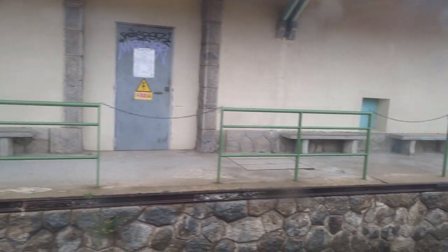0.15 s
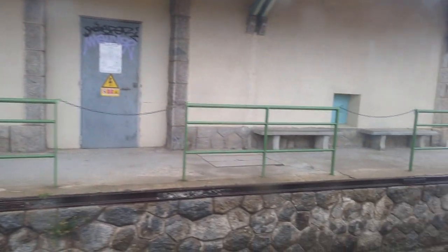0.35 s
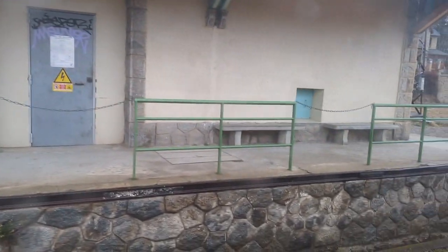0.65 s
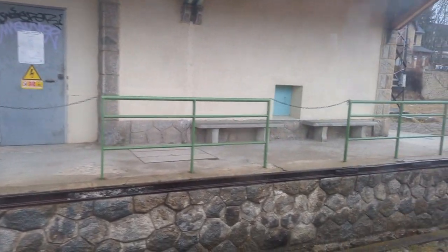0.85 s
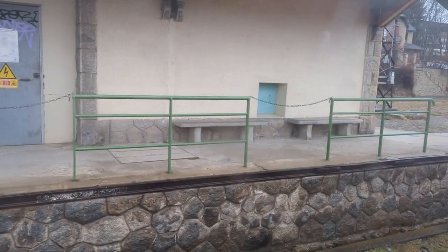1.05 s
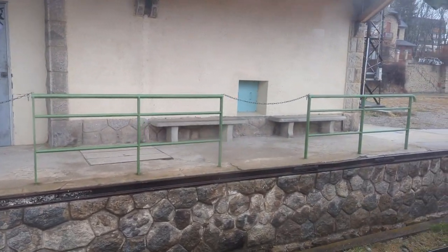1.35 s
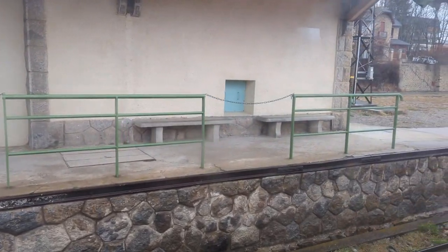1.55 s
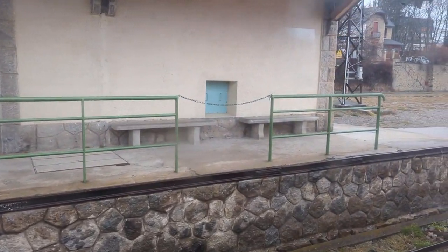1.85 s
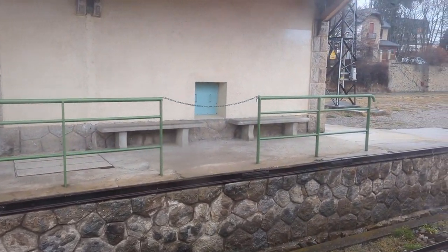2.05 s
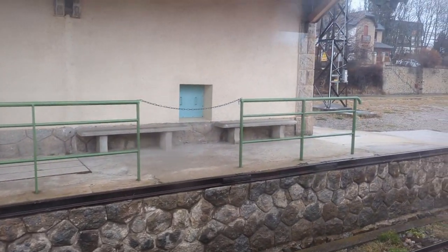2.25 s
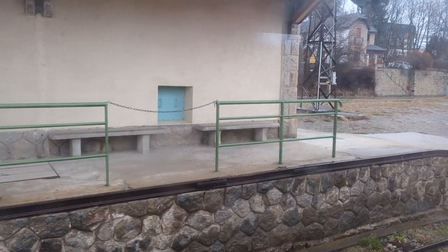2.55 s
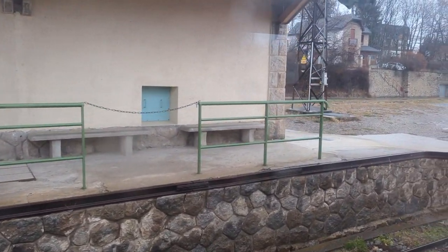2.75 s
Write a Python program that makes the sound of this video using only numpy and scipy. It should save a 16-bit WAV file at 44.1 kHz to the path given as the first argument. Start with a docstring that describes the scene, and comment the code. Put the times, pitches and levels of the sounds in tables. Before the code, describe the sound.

A train rumbles and booms, heard from a window seat as it slows into a station. Loose fittings chatter and clank close by, the floor thumps, a wheel rubs faintly, and a soft air hiss comes near the end.

```python
"""Inside a narrow-gauge electric railcar slowing into a station, stereo microphone at a window seat.
From the start the wheels rumble on the rails, the body booms and a panel drones. Jolts thump the floor;
close by, loose fittings chatter, knock, tick and clank in the small cabin, busiest in the first second.
Then a wheel rubs faintly, in fits, and near the end a soft hiss of air sets in."""
import sys
import numpy as np
from scipy import signal
from scipy.fft import rfft, irfft, next_fast_len
from scipy.io import wavfile
from scipy.ndimage import map_coordinates

SR = 44100
rng = np.random.default_rng(int(sys.argv[2]) if len(sys.argv) > 2 else 0)


def inscribe(sig):
    """Save sig as 16-bit PCM at rate SR to the path in sys.argv[1].

    A 1-D sig is mono; a 2-D sig holds one channel per row.
    Samples are clipped to [-1, 1] before scaling.
    """
    pcm = np.round(np.clip(np.atleast_2d(sig).T, -1, 1) * 32767)
    wavfile.write(sys.argv[1], SR, pcm.astype(np.int16))


N = 127890
CABIN_T60_S = 0.13

# Left-right likeness of the cabin sound and of the rattling parts. Each row: frequency in Hz, coherence.
CABIN_COHERENCE = [(60, 0.98), (280, .96), (450, 0.81), (700, 0.58), (1100, -0.15), (5600, 0.044),
                   (7000, 1), (11000, 0.98)]
RATTLE_COHERENCE = [(400, 0.8), (1200, -0.26), (4200, -0.18), (5600, 0.43), (7500, 0.97), (11000, 0.93)]
# Resonances of the loose fittings. Each row: centre in Hz, width in Hz, gain in dB.
FITTING_MODES = [(3730, 410, 2), (4290, 100, -2), (5090, 280, -3.5), (6030, 460, -3), (6310, 310, 3.5),
                 (8430, 1300, -3), (10840, 790, -4), (11550, 1400, -5.5), (14260, 900, -7.5)]


def amp(db):
    """Decibels to gain."""
    return 10 ** (np.asarray(db) / 20)


def unit(x):
    """Scale to rms 1."""
    return x / np.sqrt(np.mean(x ** 2) + 1e-20)


def along(points, hz):
    """Read (Hz, value) points on a log axis."""
    freqs, values = np.transpose(points)
    return np.interp(np.log(hz + 1), np.log(freqs + 1), values)


def clock():
    """Time of each sample in seconds."""
    return np.arange(N) / SR


def level(rows):
    """Gain per sample from (s, dB) rows."""
    return amp(np.interp(clock(), *np.transpose(rows)))


def wobble(per_s):
    """A smooth random curve, per_s knots a second."""
    return map_coordinates(rng.standard_normal(4096), [clock() * per_s], mode="wrap")


def filtered(x, response):
    """Pass x through a frequency response."""
    size = next_fast_len(N + SR // 2)
    return irfft(rfft(x, size) * response(np.fft.rfftfreq(size, 1 / SR)), size)[..., :N]


def spread(pair, coherence):
    """Turn two unrelated signals into left and right of a given likeness."""
    angle = lambda hz: np.arccos(np.clip(along(coherence, hz), -1, 1)) / 2
    mid, side = filtered(pair, lambda hz: np.array([np.cos(angle(hz)), np.sin(angle(hz))]))
    return np.array([mid + side, mid - side])


def coloured(spectrum):
    """Response through (Hz, dB) points."""
    return lambda hz: amp(along(spectrum, hz))


def resonant(modes):
    """Response of (Hz, width in Hz, dB) resonances, alternating in sign."""
    return lambda hz: sum((-1) ** k * amp(db) * 1j * hz * width / (centre**2 - hz**2 + 1j * hz * width)
                          for k, (centre, width, db) in enumerate(modes))


def shaped(pair, response, coherence):
    """A white pair coloured and spread without changing its power."""
    rms_gain = np.sqrt(np.mean(np.abs(response(np.linspace(0, SR / 2, num=8192))) ** 2))
    return spread(filtered(pair, response), coherence) / rms_gain


def rush(response):
    """Steady coloured stereo noise."""
    return unit(shaped(rng.standard_normal((2, N)), response, CABIN_COHERENCE))


def wheels():
    """Wheels rumble and roll; the rails roar above them and the running gear's steel rings along."""
    # Each row: time in seconds, relative level in dB.
    roll_levels = [(0.0, -51.5), (0.09, -48.5), (0.48, -53), (2.4, -56), (2.54, -58.5), (2.9, -55.5)]
    roar_levels = [(0, -56), (.1, -49.5), (.33, -55), (.5, -62), (.8, -62), (.97, -61.5), (1.3, -59.5),
                   (1.5, -65), (1.9, -61), (2.07, -68), (2.3, -69.5), (2.9, -66)]
    # Noise spectra. Each row: frequency in Hz, relative density in dB.
    rumble_colour = [(15, -60.5), (25, -35.5), (32, -19.5), (42, -4), (53, 2.5), (75, -1), (100, -5),
                     (125, -7), (215, -11.5), (285, -10), (340, -20.5), (450, -39.5), (900, -85.5)]
    rolling_colour = [(150, -29.5), (300, 0.5), (400, 2), (455, 0.5), (525, 1.5), (620, 0), (750, -5.5),
                      (1000, -4.5), (1250, -12.5), (2000, -54), (5000, -58.5)]
    roar_colour = [(500, -7.5), (1100, -2), (1700, 0.5), (2400, -7), (3200, -13), (3850, -10),
                   (4500, -17.5), (5400, -21.5), (6700, -24), (7500, -32.5), (15000, -39.5)]
    # Each row: centre in Hz, width in Hz, gain in dB.
    steel_modes = [(937, 30, 0.5), (1750, 180, 6), (2096, 70, 9.5), (2790, 250, 3), (4480, 29, -1.5),
                   (3950, 66, 1)]
    roll = level(roll_levels)
    rumble = amp(15.5) * roll * rush(coloured(rumble_colour))
    rolling = amp(-1) * roll * amp(2.0 * wobble(60)) * rush(coloured(rolling_colour))
    roar = amp(-1) * level(roar_levels) * amp(1.36 * wobble(35.21))
    rails = rush(coloured(roar_colour))
    steel = amp(-8.5) * rush(resonant(steel_modes))
    return rumble + rolling + roar * (rails + steel)


def hum(hz, drift_rad, drift_per_s, flutter_db):
    """A narrow body resonance kept ringing by the wheels."""
    phase = 2 * np.pi * hz * clock() + drift_rad * wobble(drift_per_s)
    return np.sqrt(2) * np.sin(phase) * amp(flutter_db * wobble(27.19))


def body():
    """The car body booms around the microphone and a panel drones."""
    # Each row: time in seconds, relative level in dB.
    boom_levels = [(0.0, -30), (0.08, -52), (0.1, -25), (0.19, -39.5), (0.47, -26.5), (0.61, -37.5),
                   (0.85, -33), (0.89, -47.5), (0.95, -30.5), (1.07, -52.5), (1.11, -33.5), (1.19, -51),
                   (1.25, -32.5), (1.41, -67), (1.47, -40.5), (1.72, -50.5), (1.82, -34), (1.88, -43),
                   (1.95, -34), (2.13, -53), (2.81, -42.5)]
    drone_levels = [(0, -47.5), (.5, -50.5), (.68, -41), (1.12, -66.5), (1.26, -40.5), (1.42, -38),
                    (1.51, -32.5), (1.565, -41.5), (1.6, -37.5), (1.65, -51), (2.9, -62.5)]
    boom = level(boom_levels) * hum(hz=69.34, drift_rad=0.37, drift_per_s=16, flutter_db=0.5)
    drone = level(drone_levels) * hum(hz=244.8, drift_rad=0.4, drift_per_s=9, flutter_db=0.8)
    return amp(0.5) * boom + amp(-2) * drone


def cabin(x, wet_db):
    """Add the short, dense echo of the passenger cabin."""
    t = np.arange(SR // 3) / SR
    tail = rng.standard_normal((2, len(t))) * amp(-60 * t / CABIN_T60_S) * (1 - np.exp(-t / 0.0077))
    return x + amp(wet_db) * signal.fftconvolve(x, tail / np.linalg.norm(tail[0]), axes=1)[:, :N]


def clink(t, rise_s, modes, t60_s, detune=0.004, scatter_db=2.5):
    """Metal modes build up over the first contacts and ring out, a little differently each time."""
    t = np.maximum(t, 0)
    envelope = (1 - np.exp(-t / (rise_s + 0.006))) * amp(-60 * t / t60_s)
    ring = 0
    for hz, db in modes:
        gain = amp(db + scatter_db * rng.standard_normal((2, 1)))
        pitch = hz * (1 + detune * rng.standard_normal())
        ring += gain * np.sin(2 * np.pi * (pitch * t + rng.random((2, 1))))
    return envelope * ring


def rattles(hold_s=0.0032, t60_s=0.098, contacts_per_s=1500):
    """Each shake is a quick cluster of tiny contacts that ring a fitting and its panel."""
    # Each row: start in seconds, relative treble, middle and ring levels in dB, rise in seconds.
    shakes = [(0, -60.5, -50.5, -64, 0.0018), (0.022, -59.5, -63, -69, .003),
              (0.072, -52.5, -40.5, -57, .016), (0.137, -54.5, -52.5, -63, 0.014),
              (.197, -54.5, -51.5, -53.5, 0.0022), (0.289, -61, -54.5, -83, 0.0021),
              (0.319, -56, -54, -57, 0.0017), (0.402, -65.5, -52, -56, 0.0063),
              (0.539, -56.5, -54.5, -63, 0.0096), (0.594, -63.5, -61, -56, 0.002),
              (0.65, -63, -74, -56, 0.0039), (.711, -65, -55, -59.5, 0.0025),
              (0.939, -80, -55.5, -68, 0.014), (1.349, -73, -53.5, -68, 0.0069),
              (1.548, -76, -56.5, -68.5, 0.0081), (1.747, -78, -54.5, -82, 0.0081),
              (1.774, -66, -68, -56.5, 0.0076), (1.948, -76, -57, -67, 0.013),
              (2.144, -82, -55, -78, 0.022), (2.349, -84, -57.5, -81, 0.0084),
              (2.393, -82, -59, -64, 0.022), (2.756, -76, -58, -64, 0.013)]
    # A fitting's clear ring and the panel that carries it. Each row: frequency in Hz, gain in dB.
    ring_modes = [(1700, -4.5), (2950, -3), (3700, -2.5), (4450, 1.5), (5100, -6), (5720, -4.5), (5860, -6),
                  (6520, -1), (6650, -8.5), (8300, -7), (13750, -15)]
    panel_colour = [(200, -33), (480, 9), (750, 0), (1000, -3.5), (1350, -1), (1850, -5), (2130, -3),
                    (2420, -7), (2650, -11.5), (4000, -12.5), (7000, -27.5), (15000, -52.5)]
    treble, middle = np.zeros((2, N))
    ring = np.zeros((2, N))
    for start, treble_db, middle_db, ring_db, rise_s in shakes:
        span = slice(int(start * SR), int(start * SR) + SR // 4)
        t = clock()[span] - start
        shake = np.clip(t / rise_s, 0, 1) * amp(-60 * np.maximum(t - rise_s - hold_s, 0) / t60_s)
        treble[span] += amp(treble_db) * shake
        middle[span] += amp(middle_db) * shake
        ring[:, span] += amp(ring_db) * clink(t, rise_s, ring_modes, t60_s=0.084)
    contacts = lambda: unit(rng.standard_normal((2, N)) * (0.61 + (rng.random(N) < contacts_per_s / SR)))
    fitting = shaped(cabin(treble * contacts(), wet_db=-6), resonant(FITTING_MODES), RATTLE_COHERENCE)
    panel = shaped(cabin(middle * contacts(), wet_db=-2.5), coloured(panel_colour), RATTLE_COHERENCE)
    return fitting + panel + spread(ring, RATTLE_COHERENCE)


def bursts(events, t60_s, wet_db):
    """A short noisy burst for each (s, dB) event, with the cabin's diffuse tail."""
    def decay(t):
        direct = amp(-60 * np.abs(t) / t60_s)
        tail = amp(wet_db - 60 * np.abs(t) / CABIN_T60_S)
        return (t >= 0) * np.hypot(direct, tail)
    return rng.standard_normal((2, N)) * sum(amp(db) * decay(clock() - start) for start, db in events)


def knocks():
    """Dull knocks in the floor and walls."""
    # Each row: start in seconds, level in dB.
    hits = [(.085, -41.5), (.325, -42), (.547, -43.5), (1.612, -44.5), (1.695, -44.5), (2.757, -48.5)]
    # Each row: frequency in Hz, relative density in dB.
    colour = [(200, -9), (480, 9.5), (700, 1), (1100, -7.5), (2000, -9), (4000, -29), (9000, -69)]
    return shaped(bursts(hits, t60_s=0.041, wet_db=-11), coloured(colour), CABIN_COHERENCE)


def ticks():
    """Small hard parts click close to the microphone."""
    # Each row: start in seconds, level in dB.
    hits = [(.0865, -46), (.323, -54), (1.0942, -44), (1.453, -68), (1.615, -71.5)]
    # Each row: frequency in Hz, relative density in dB.
    colour = [(2000, -36), (4200, 0.5), (5400, -7.5), (6500, 6.5), (7600, -6.5), (9500, -5), (11500, 0),
              (14800, -5.5), (15900, -7.5)]
    # Each row: frequency in Hz, left-right coherence.
    coherence = [(4000, -0.13), (6500, 0.24), (12000, -.1)]
    return shaped(bursts(hits, t60_s=0.012, wet_db=-7.5), coloured(colour), coherence)


def thumps(rise_s=0.013):
    """Each jolt thumps the floor: a low note swells and dies within a few cycles."""
    # Each row: start in seconds, level in dB, pitch in Hz.
    jolts = [(0.089, -27.5, 59), (0.542, -29, 94.4), (1.7974, -21.5, 62.8), (2.23, -37.5, 253),
             (2.522, -29, 62)]
    out = np.zeros(N)
    for start, db, hz in jolts:
        t = np.maximum(clock() - start, 0)
        swell = (t / rise_s * np.exp(1 - t / rise_s)) ** 2
        out -= amp(db) * swell * np.sin(2 * np.pi * hz * t)
    return out


def clanks(clank_t60_s=0.083, ping_t60_s=0.12):
    """A heavier loose metal part clanks; small ones ping on a single note."""
    # Each row: start in seconds, relative level in dB.
    heavy_hits = [(0.095, -48), (.403, -41), (.592, -51.5), (0.65, -52.5), (.712, -54.5)]
    # Each row: frequency in Hz, gain in dB.
    heavy_modes = [(1744, 3), (1905, -3), (2130, -3), (3620, -11), (3779, -12.5), (4242, -23)]
    # Each row: start in seconds, relative level in dB, pitch in Hz.
    pings = [(.14, -48, 2430), (0.239, -48.5, 2500), (.288, -45, 2420), (0.541, -58, 3960),
             (.744, -59, 3960), (.944, -65, 3960), (2.152, -59, 3950)]
    blows = [(start, db, heavy_modes, clank_t60_s) for start, db in heavy_hits]
    blows += [(start, db, [(hz, 0)], ping_t60_s) for start, db, hz in pings]
    out = np.zeros((2, N))
    for start, db, modes, t60_s in blows:
        span = slice(int(start * SR), int(start * SR) + SR // 4)
        out[:, span] += amp(db) * clink(clock()[span] - start, rise_s=0.0017, modes=modes, t60_s=t60_s)
    return spread(out, RATTLE_COHERENCE)


def wheel_rub(mode_hz=1504, wander_hz=25.86, scrape_db=-5):
    """A wheel rubs: its one mode wanders as the grip comes and goes, with a faster scrape on top."""
    # Each row: time in seconds, relative level in dB.
    rub_levels = [(.76, -83), (.85, -63.5), (1.2, -68.5), (1.28, -58), (1.45, -69.5), (1.57, -60.5),
                  (1.75, -82.5), (2.55, -80), (2.72, -67.5)]
    hz = mode_hz + wander_hz * wobble(per_s=45)
    tone = np.exp(2j * np.pi * np.cumsum(hz) / SR)
    jitter = lambda per_s: np.array([wobble(per_s) + 1j * wobble(per_s) for _ in range(2)])
    grip = jitter(per_s=110) + amp(scrape_db) * jitter(per_s=480)
    return amp(2.5) * level(rub_levels) * unit(spread(np.real(grip * tone), CABIN_COHERENCE))


def air_hiss(start_s=2.536, rise_s=0.021, whistle_db=-7.5):
    """A hiss, likely from the brakes, opens with a small spurt and whistles thinly in its pipe."""
    # Each row: frequency in Hz, gain in dB.
    hiss_colour = [(500, -7), (1250, 8.5), (1700, 6), (2400, -0.5), (2750, -2.5), (3900, 1), (4500, -10),
                   (5500, -8.5), (7200, -25), (8500, -21), (15000, -33.5)]
    pipe_modes = [(2660, -0.5), (2960, 0), (3370, -3), (3960, -1.5), (4240, -7), (4570, -8), (4785, -6.5)]
    t = clock() - start_s
    flow = amp(-62) * np.clip(t / rise_s, 0, 1)
    spurt = amp(-78.5) * np.exp(-((t - 0.035) / 0.0056) ** 2)
    pipe = lambda hz: sum(resonant([(centre, 63, 0)])(hz) ** 2 * amp(db) for centre, db in pipe_modes)
    whistle = amp(whistle_db) * rush(pipe)
    hiss = flow * (rush(coloured(hiss_colour)) + whistle) + spurt * rush(resonant(FITTING_MODES))
    return hiss * amp([[1.5], [-1.5]])  # a little to the left


def scene():
    """Everything as heard at a window seat, most bands leaning left."""
    # Each row: frequency in Hz, left over right in dB.
    balance = [(250, 0.5), (430, 1), (600, 1), (900, 3.5), (1130, 5.5), (1530, -6), (1850, 2), (2300, 1),
               (2800, 6.5), (3600, 3.5), (4500, 1), (14000, 1)]
    sound = wheels() + wheel_rub() + body() + thumps()
    sound = sound + rattles() + clanks() + ticks() + knocks() + air_hiss()
    return filtered(sound, lambda hz: amp(np.outer([0.5, -0.5], along(balance, hz))))


def record(dry):
    """The microphone's band limit, a narrow dip and peak in the treble, and a quick closing fade."""
    # Each row: frequency in Hz, gain in dB.
    dip_and_peak = [(4020, 0), (4120, -9), (4230, 4), (4350, 0)]
    top_hz, fade_s = 15800, 0.012
    fade = np.clip((N / SR - clock()) / fade_s, 0, 1) ** 2
    return filtered(dry * fade, lambda hz: coloured(dip_and_peak)(hz) * (hz < top_hz))


dry = scene()
out = record(dry)
inscribe(out)
```